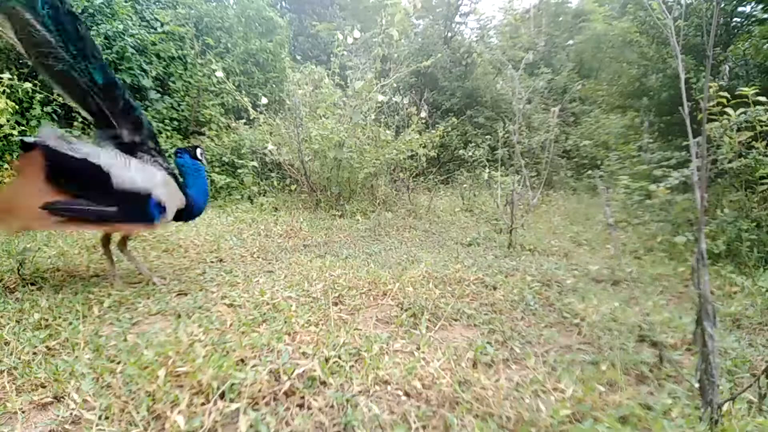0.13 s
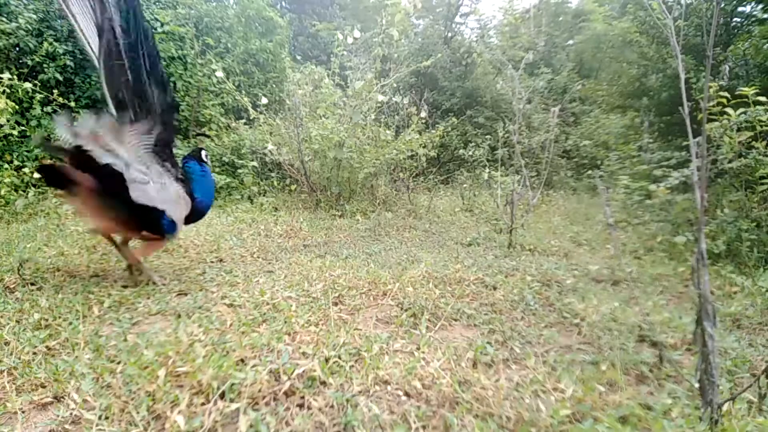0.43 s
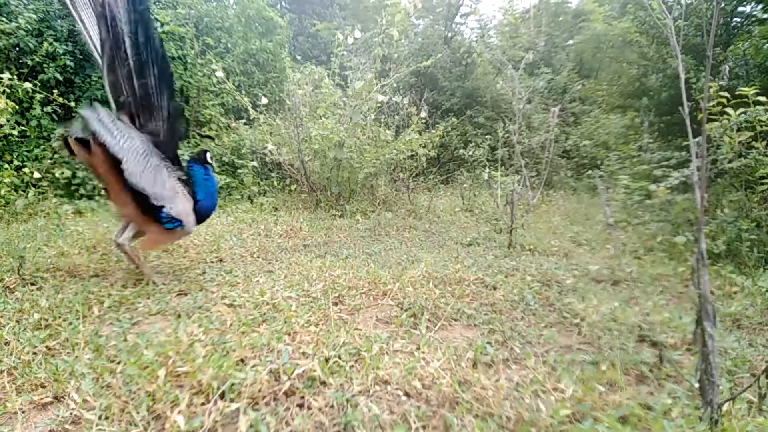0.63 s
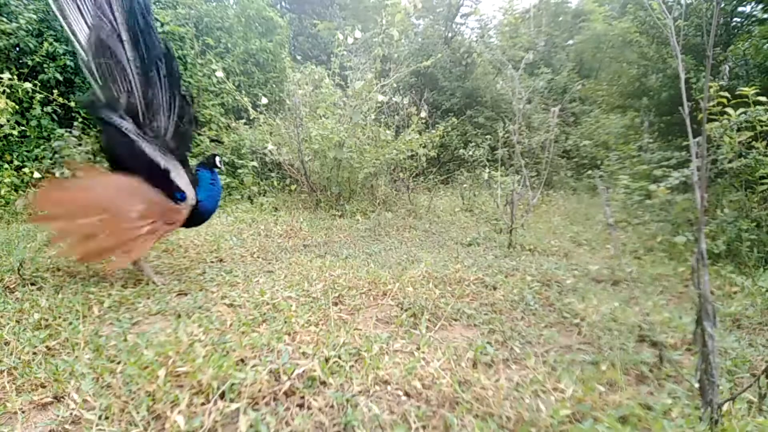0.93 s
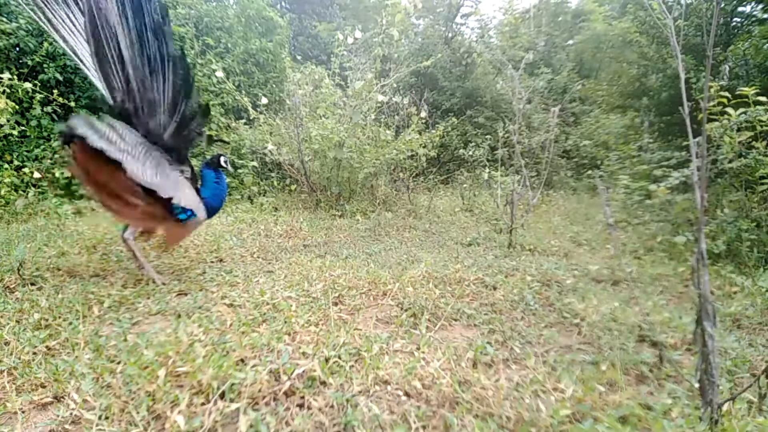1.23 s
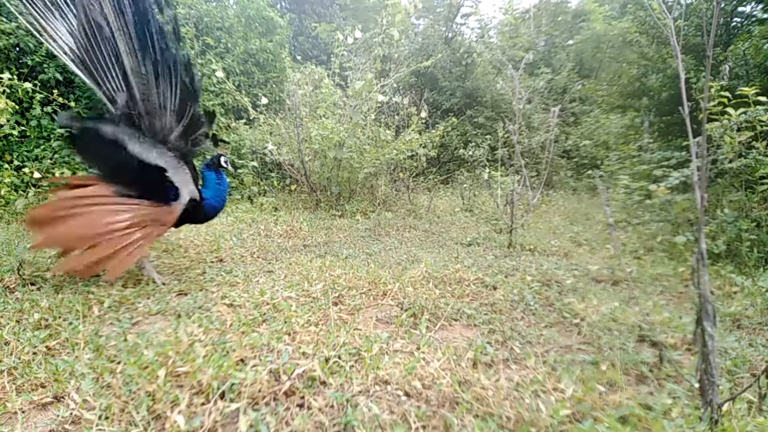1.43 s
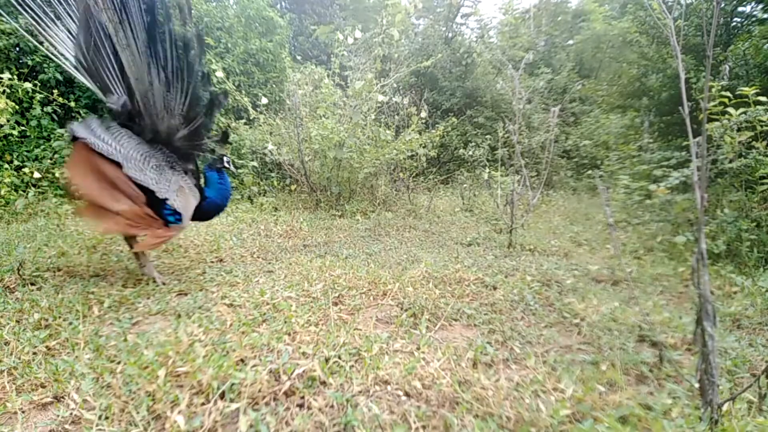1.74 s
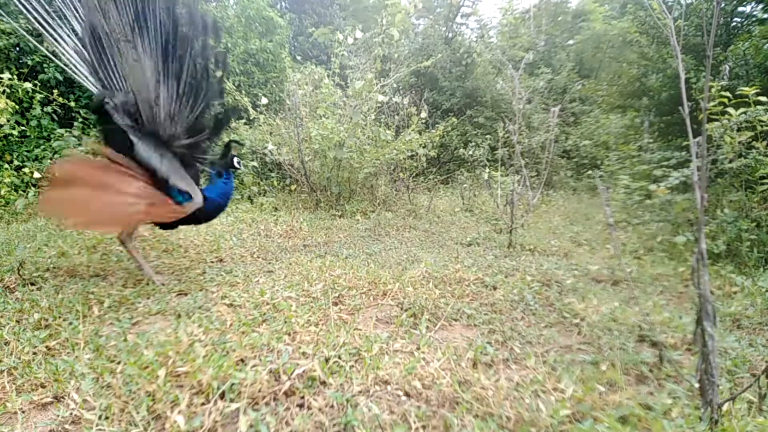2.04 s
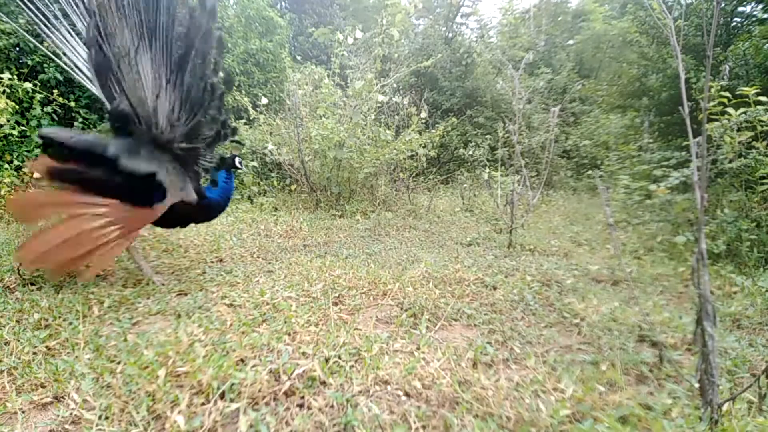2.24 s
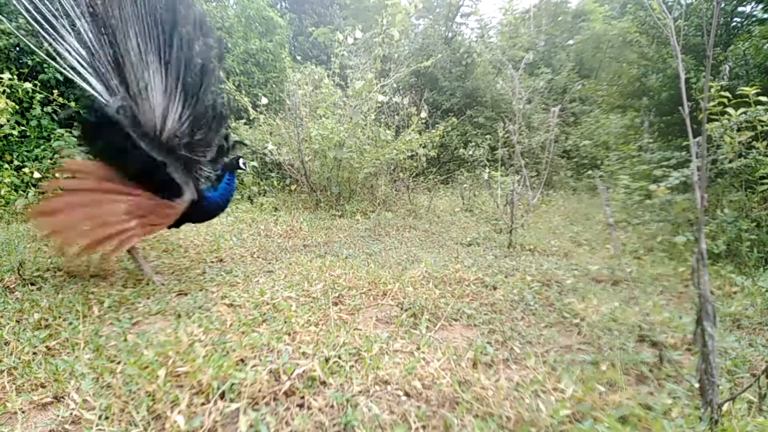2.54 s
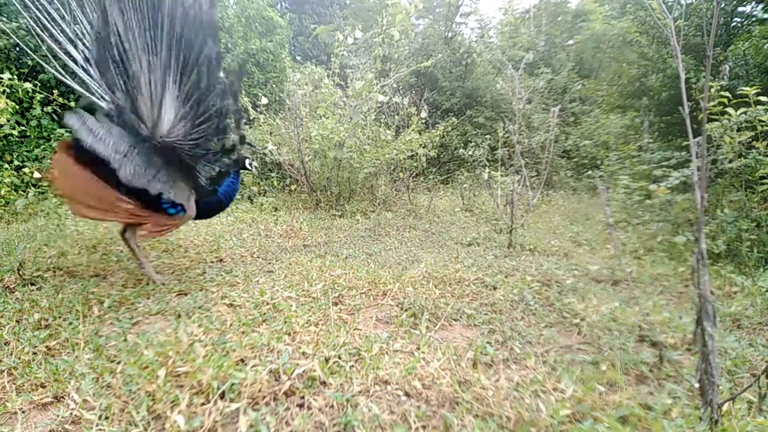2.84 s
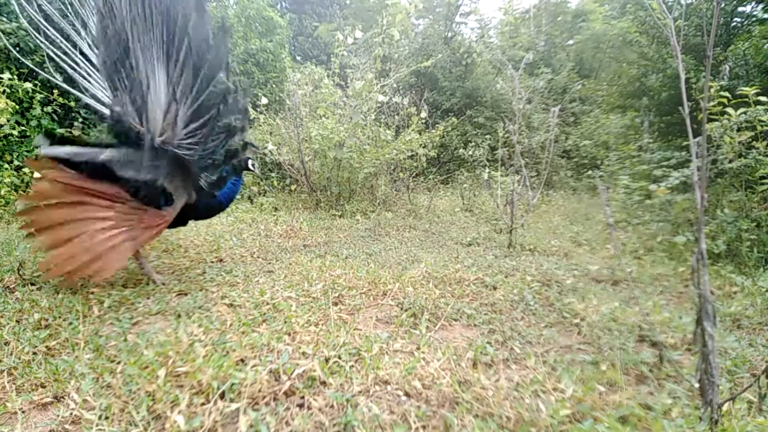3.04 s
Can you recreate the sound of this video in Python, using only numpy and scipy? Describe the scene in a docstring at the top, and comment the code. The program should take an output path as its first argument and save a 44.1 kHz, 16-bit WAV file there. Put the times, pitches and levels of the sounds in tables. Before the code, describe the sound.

A peacock shakes its wing feathers in rapid, dry swishes full of ticking quills, sharp snaps and soft flaps of air. The shakes start loudest, then continue more lightly over a faint low outdoor rumble.

```python
"""A steady rustle of feathers and a low outdoor rumble open the scene: a peacock displays in a clearing.
It shakes its wings about nine times a second. Friction and turbulence make each shake a swish of vanes,
full of dry quill ticks, with soft low flaps of displaced air and louder quill snaps.
The stereo channels differ in level and phase, with opposite phase around 2.3-2.8 kHz."""
import sys
import numpy as np
from scipy import signal
from scipy.fft import rfft, irfft
from scipy.io import wavfile
from scipy.ndimage import uniform_filter1d

SR = 44100
rng = np.random.default_rng(int(sys.argv[2]) if len(sys.argv) > 2 else 0)


def transcribe(u):
    """Save the signal u as a 16-bit wav file named by the first command-line argument.

    u: samples, shape (n,) or (channels, n), limited to [-1, 1]; the rate is SR.
    q: integer samples, one column per channel.
    """
    v = np.clip(np.atleast_2d(u).T, -1, 1)
    q = np.round(v * 32767).astype(np.int16)
    wavfile.write(sys.argv[1], SR, q)


N = 141120
TIME = np.arange(N) / SR


def amp(db):
    """The decibel law: 20 dB is a tenfold amplitude."""
    return 10 ** (np.asarray(db) / 20)


def unit_rms(x):
    """Normalisation to unit mean power."""
    return x / np.sqrt(np.mean(x ** 2, axis=-1, keepdims=True) + 1e-20)


def coloured(x, spectrum, peak_hz=None):
    """Spectral shaping at unit power gain for white noise, with an optional broad 10 dB peak."""
    hz = np.fft.rfftfreq(N, 1 / SR) + 1
    knots_hz, db = np.transpose(spectrum)
    gain = amp(np.interp(np.log(hz), np.log(knots_hz), db))
    if peak_hz:
        gain *= amp(10 * np.exp(-np.log2(hz / peak_hz) ** 2 / .5))
    return irfft(rfft(x) * unit_rms(gain), N)


def wander(length_s, db):
    """Random amplitude modulation: a gain that drifts on the given time scale."""
    size = round(length_s * SR)
    drift = uniform_filter1d(uniform_filter1d(rng.standard_normal(N), size), size)
    return amp(db * np.clip(unit_rms(drift), -2, 2))


def patchy_noise(depth_db=4):
    """Comodulation: two noises share loud and quiet patches in time and frequency."""
    spectra = signal.stft(rng.standard_normal((2, N)), nperseg=256)[2]
    patches = uniform_filter1d(rng.standard_normal(spectra.shape[1:]), size=19, axis=0)
    patches = uniform_filter1d(patches, size=9, axis=1)
    return signal.istft(spectra * amp(depth_db * patches / patches.std()), nperseg=256)[1][:, :N]


def burst(rise_s):
    """A transient's envelope: a quick swell to 1, then near-exponential decay."""
    u = np.arange(600) / SR / rise_s
    return (u * np.exp(1 - u)) ** 2


# Background levels (time [s], rustle level [dB], rumble level [dB])
BACKGROUND = [(.12, -34, -35), (.7, -36, -32.5), (1.25, -37, -36.5), (2.65, -36, -37.5), (2.9, -41.5, -43),
              (3.2, -44.5, -46)]
def background_gain(column):
    """Slow amplitude envelope of the rustle (column 1) or the rumble (column 2)."""
    rows = np.array(BACKGROUND)
    return amp(np.interp(TIME, rows[:, 0], rows[:, column]))


# Spectrum of the train (frequency [Hz], relative level [dB])
TRAIN_SPECTRUM = [(700, -30), (2500, 0), (14000, -3)]
def train_rustle():
    """Friction noise: the feathers of the raised train rustle steadily."""
    return unit_rms(coloured(patchy_noise(), TRAIN_SPECTRUM)) * background_gain(column=1)


# Spectrum of the outdoor rumble (frequency [Hz], relative level [dB])
RUMBLE_SPECTRUM = [(40, -34), (60, -7.5), (90, 2), (300, -5), (700, -9.5), (1200, -35.5)]
def outdoor_rumble():
    """Amplitude-modulated noise: a low rumble whose level flickers."""
    noise = coloured(rng.standard_normal((2, N)), RUMBLE_SPECTRUM)
    return unit_rms(noise * wander(.011, db=3)) * background_gain(column=2)


# Spectrum of the quills (frequency [Hz], relative level [dB])
QUILL_SPECTRUM = [(200, -9.5), (1500, 4.5), (14000, 0)]
def quill_ticks(shake_per_s=500, rustle_per_s=130, peaks_hz=(600, 1400, 3000, 6000, 11000)):
    """Shot noise: quills tick at random, in clumps, as loudly as the shakes and the rustle dictate."""
    chance, band_draw = rng.random((2, N))
    strength = amp(4.5 * np.minimum(rng.exponential(1, N), 3))
    threshold = chance * SR / wander(.015, db=6)  # the tick rates swing about their base values
    in_shakes = (threshold < shake_per_s) * amp(-2) * shake_gain()
    in_rustle = (threshold < rustle_per_s) * amp(-17) * background_gain(column=1)
    impulses = strength * (in_shakes + in_rustle)
    band = np.floor(band_draw * len(peaks_hz))
    ticks = 0
    for k, hz in enumerate(peaks_hz):
        envelope = signal.oaconvolve(impulses * (band == k), burst(rise_s=.00042))[:N]
        ticks += coloured(envelope * rng.standard_normal((2, N)), QUILL_SPECTRUM, hz)
    return ticks


# Wing shakes (time [s], duration [s], relative level [dB], flutter emphasis before weighting [dB])
WING_SHAKES = [(0.143, 0.057, -24.5, -2.5), (0.252, 0.048, -23.5, -2), (0.348, 0.063, -26, -2.5),
               (0.452, 0.065, -21, -10), (0.565, 0.055, -21.5, -2.5), (0.673, 0.055, -25.5, -7),
               (0.781, 0.072, -29, 0.5), (0.877, 0.11, -29, -4.5), (0.997, 0.1, -34.5, 5),
               (1.111, 0.098, -38.5, 10.5), (1.309, 0.041, -36, 4), (1.381, 0.083, -29.5, -3),
               (1.537, 0.078, -40.5, 12), (1.657, 0.058, -29.5, 3.5), (1.75, 0.088, -33, 4),
               (1.884, 0.072, -35.5, 7.5), (1.994, 0.093, -35.5, 7), (2.111, 0.071, -32.5, 5.5),
               (2.237, 0.065, -28.5, 2), (2.36, 0.064, -31, 1.5), (2.452, 0.14, -44, 11.5),
               (2.599, 0.079, -38.5, 10.5), (2.728, 0.075, -34, 1.5), (2.865, 0.079, -42, 5)]
def shake_gain(flutter_weight=0):
    """Incoherent addition: shakes sum in power, each rising, sagging and stopping quickly."""
    power = np.zeros(N)
    for start, length, db, flutter_db in WING_SHAKES:
        u = (TIME - start) / length
        rise = np.clip(u / .21, 0, 1)
        sag = amp(-2.5 * np.clip(u, 0, 2) ** 2)
        stop = np.clip((1.15 - u) / .41, 0, 1)
        power += (amp(db + flutter_weight * flutter_db) * rise * sag * stop) ** 2
    return np.sqrt(power)


# Spectra of the vanes' hiss and flutter (frequency [Hz], relative level [dB])
HISS_SPECTRUM = [(600, -34), (1000, -8), (1500, 12), (7000, 1), (14000, -24)]
FLUTTER_SPECTRUM = [(90, -14), (200, -1.5), (700, 0), (1100, -17), (2500, -18.5)]
def vane_swish():
    """Turbulence and friction: vanes brush through air and past each other, hissing and fluttering."""
    hiss = unit_rms(coloured(patchy_noise(), HISS_SPECTRUM))
    flutter = unit_rms(coloured(rng.standard_normal((2, N)), FLUTTER_SPECTRUM) * wander(.004, db=4))
    return amp(-8) * hiss * shake_gain() + flutter * shake_gain(flutter_weight=.7)


# Flaps of air (time [s], relative level [dB])
AIR_FLAPS = [(0.162, -11), (0.268, -17), (0.367, -32), (0.704, -8), (0.931, -17), (1.176, -13),
             (1.385, -12.5), (1.425, -18.5), (1.576, -17.5), (1.68, -18), (1.828, -10), (1.912, -14.5),
             (2.106, -15.5), (2.141, -16), (2.273, -18), (2.344, -13.5), (2.631, -12.5), (2.746, -26),
             (2.84, -20), (3.042, -21.5)]
def air_flaps(pitch_range_hz=(293, 656), rise_cycles=.37):
    """Damped oscillation: each flap pushes a cycle or two of air, with a papery slap of the vanes."""
    pulses, slaps = np.zeros(N + 1500), np.zeros(N + 600)
    for (start, db), hz in zip(AIR_FLAPS, rng.uniform(*pitch_range_hz, len(AIR_FLAPS))):
        onset = round(start * SR)
        cycles = TIME[:1500] * hz
        envelope = cycles / rise_cycles * np.exp(1 - cycles / rise_cycles)
        pulses[onset:][:1500] += amp(db - 4.5) * envelope * np.sin(2 * np.pi * cycles)
        slaps[onset:][:600] += amp(db - 15.5) * burst(rise_s=.0036)
    slap_spectrum = [(500, -32), (1300, -15), (3000, -9.5)]  # (frequency [Hz], relative level [dB])
    return pulses[:N] + coloured(slaps[:N] * rng.standard_normal((2, N)), slap_spectrum)


# Quill snaps (time [s], relative level [dB])
QUILL_SNAPS = [(0.1809, -7.5), (0.2512, -18.5), (0.287, -18), (0.372, -12.5), (0.4729, -10), (0.4984, -15),
               (0.5725, -13), (0.5946, -10), (0.607, -14), (0.6856, -22), (0.7028, -7.5), (0.9202, -8),
               (1.0097, -18), (1.1792, -10.5), (1.3246, -17), (1.4038, -23), (1.4491, -19), (1.5879, -15.5),
               (1.6624, -14.5), (1.7628, -12.5), (1.7911, -7), (1.8291, -11), (1.891, -14.5), (2.0191, -9),
               (2.1091, -17.5), (2.1331, -14.5), (2.2232, -10.5), (2.2507, -11.5), (2.3481, -19),
               (2.374, -14.5), (2.4677, -20), (2.4981, -15), (2.5296, -14), (2.5464, -16.5), (2.609, -17),
               (2.6592, -16), (2.7457, -18.5), (2.7816, -22), (3.0834, -26.5)]
def quill_snaps(rise_s=.0009):
    """Impulsive excitation: a quill's snap is so brief that its spectrum is broad."""
    envelope = np.zeros(N + 600)
    for start, db in QUILL_SNAPS:
        envelope[round(start * SR):][:600] += amp(db - 4.5) * burst(rise_s)
        envelope[round((start + rise_s) * SR)] *= amp(12)  # one sharp crack at the crest
    return coloured(envelope[:N] * rng.choice([-1., 1.], (2, N)), QUILL_SPECTRUM)


def scene():
    """Superposition: the sources sum in two signals, alike in level and unlike in fine grain."""
    return vane_swish() + quill_ticks() + quill_snaps() + air_flaps() + train_rustle() + outdoor_rumble()


# Treble roll-off of both channels (frequency [Hz], gain [dB])
ROLL_OFF = [(14100, -0.5), (14600, -25), (15200, -44)]
# Left channel against right, in opposite phase around 2.3-2.8 kHz
# (frequency [Hz], level [dB], phase lead [half turns], coherence [0-1])
STEREO_IMAGE = [(300, 0, -.17, .99), (600, -2.3, -.26, .98), (1030, 1, -.45, .9), (1700, -1.9, -.75, .85),
                (2280, 0, -1, 1), (2760, 0, -1, 1), (3450, 1.3, -1.45, .6), (6100, 4.8, -2.8, .52),
                (7100, 0, -4, .85), (13000, -10, -4, .7)]
def record(dry, start_s=.1178, low_cut_hz=50, high_cut_hz=16500):
    """Partial coherence: the right channel is the first signal, the left a phase-shifted blend of both."""
    hz = np.fft.rfftfreq(N, 1 / SR)
    knots_hz, *columns = np.transpose([(0, 0, .061, .99)] + STEREO_IMAGE)
    db, lead, coherence = (np.interp(hz, knots_hz, column) for column in columns)
    right, second = rfft(dry) * amp(np.interp(hz, *np.transpose(ROLL_OFF)))
    blend = coherence * right + np.sqrt(1 - coherence ** 2) * second
    left = blend * amp(db) * np.exp(1j * np.pi * lead)
    sway = wander(.03, db=.8)  # the balance sways as different feathers sound
    fade_in = np.clip((TIME - start_s) / .0018, 0, 1)
    pair = np.array([irfft(left, N) * sway, irfft(right, N)]) * fade_in
    pair = signal.sosfilt(signal.butter(3, low_cut_hz, "high", fs=SR, output="sos"), pair)
    low_pass = signal.firwin(511, high_cut_hz, window=("kaiser", 9), fs=SR)
    return signal.oaconvolve(pair, low_pass[None], "same")


dry = scene()
out = record(dry)
transcribe(out)
```